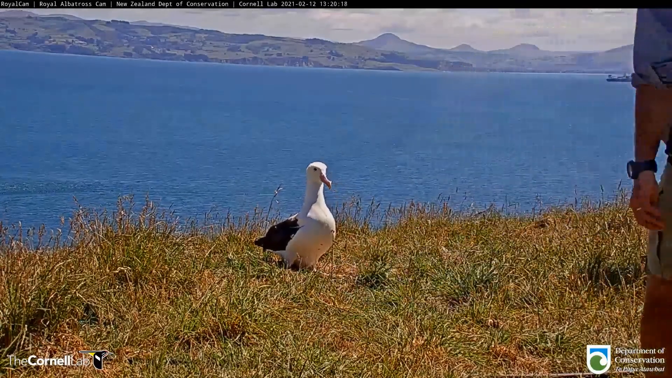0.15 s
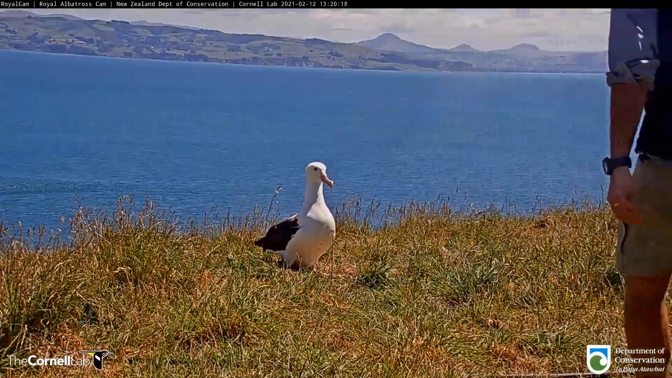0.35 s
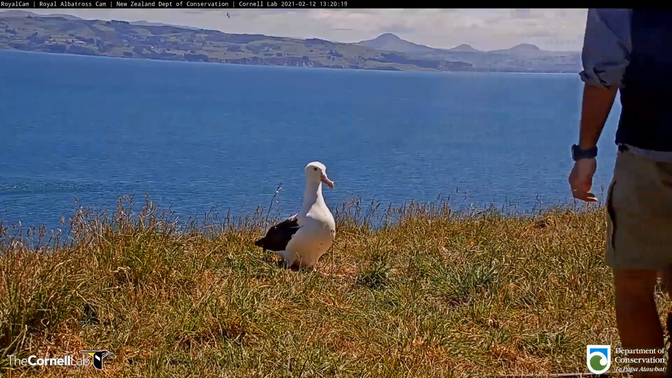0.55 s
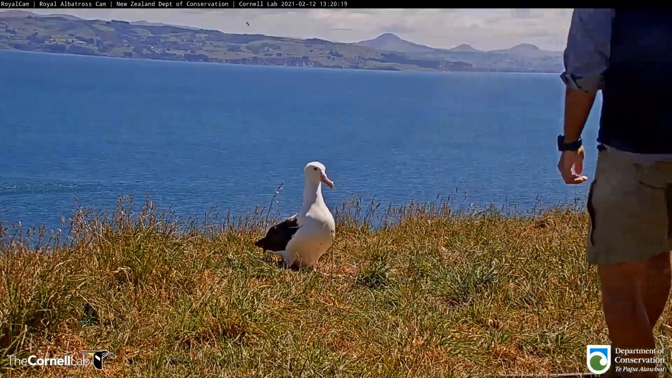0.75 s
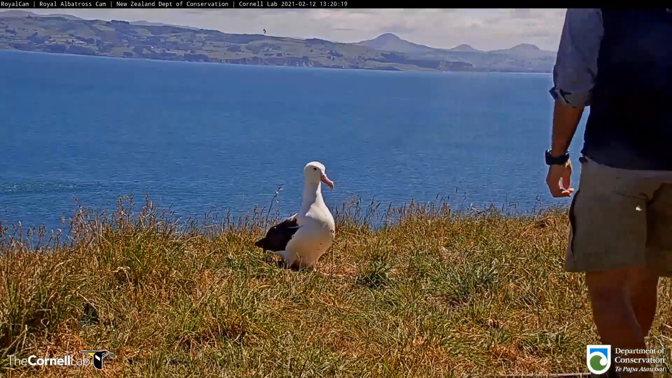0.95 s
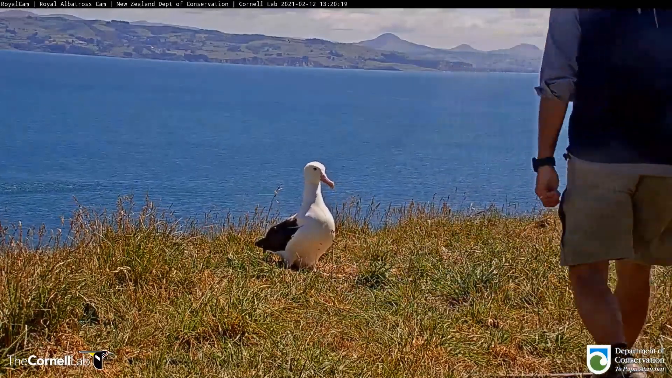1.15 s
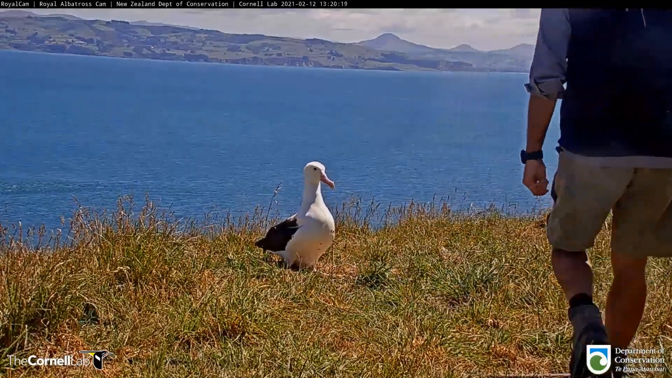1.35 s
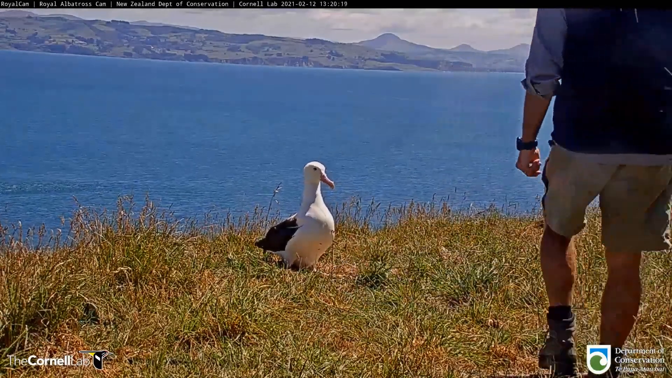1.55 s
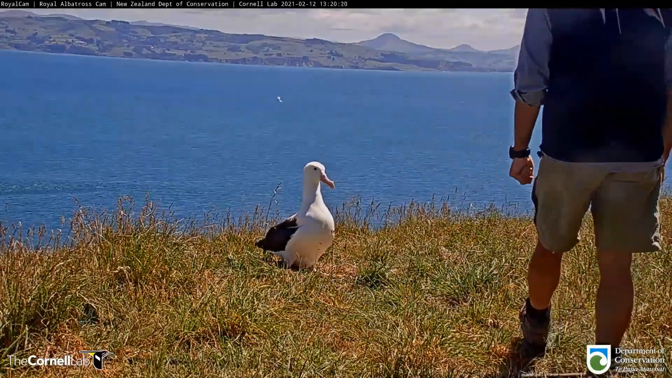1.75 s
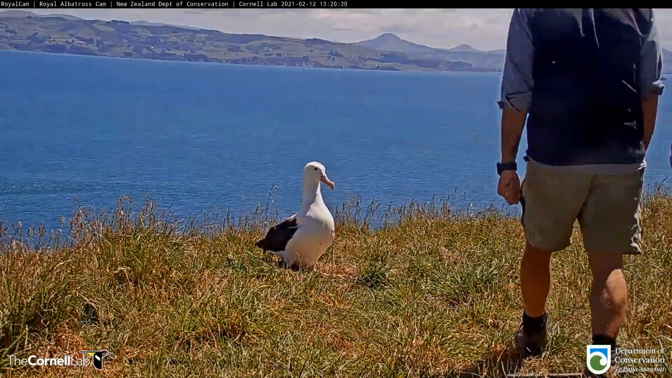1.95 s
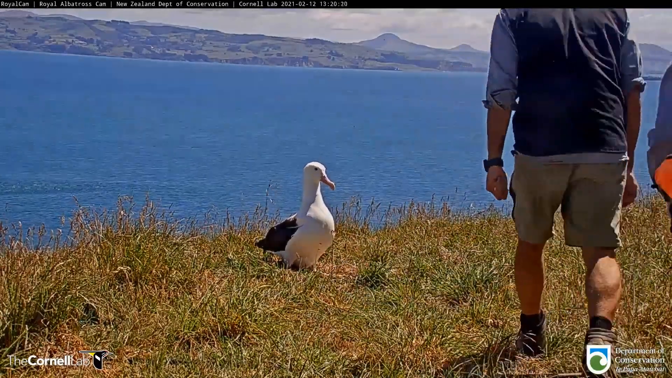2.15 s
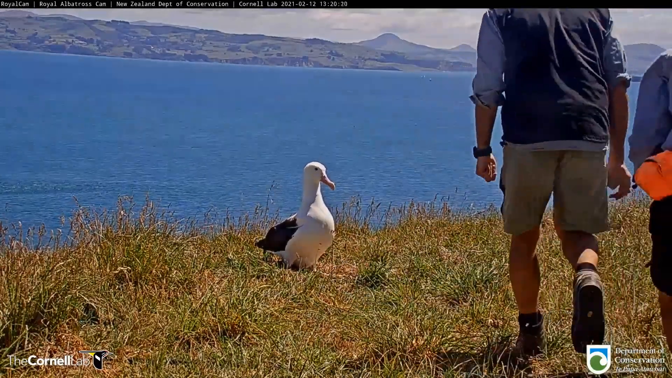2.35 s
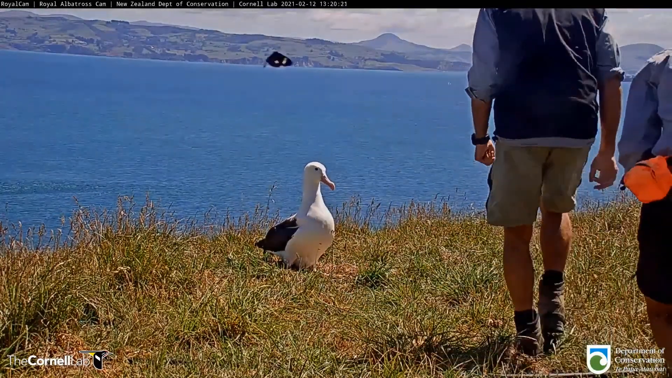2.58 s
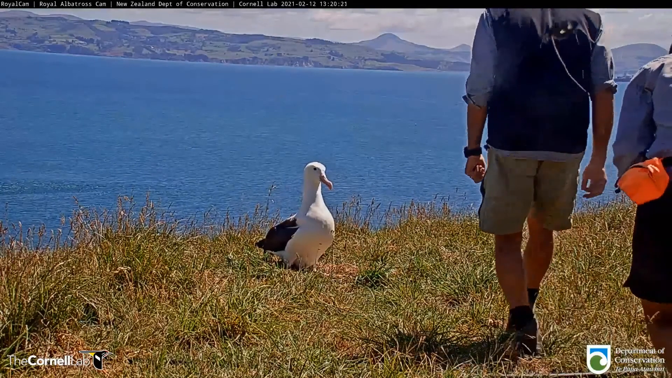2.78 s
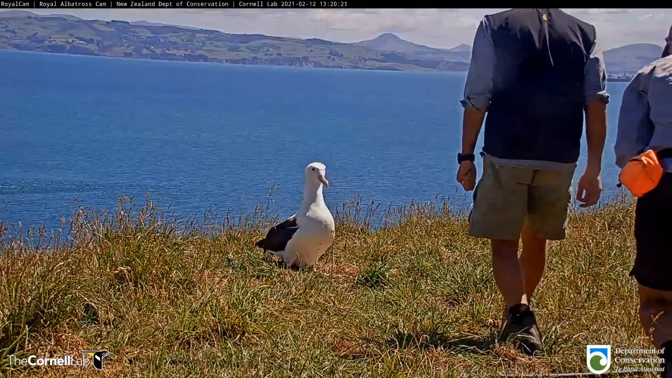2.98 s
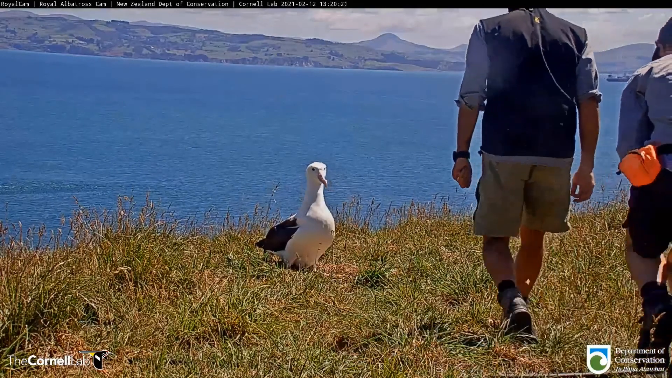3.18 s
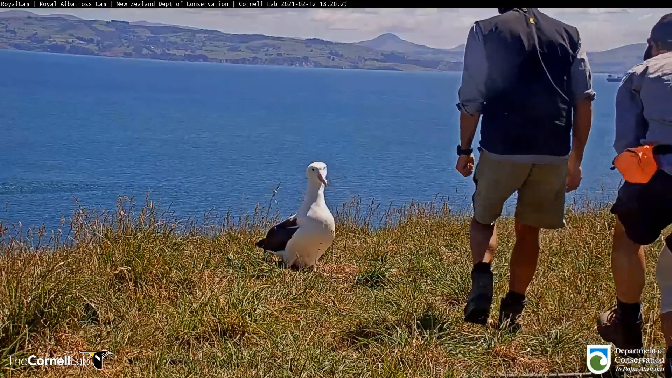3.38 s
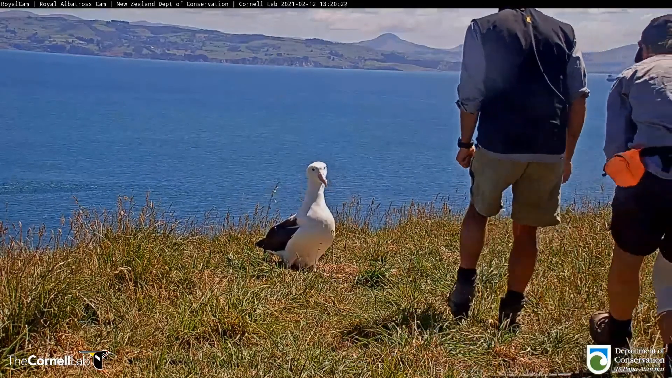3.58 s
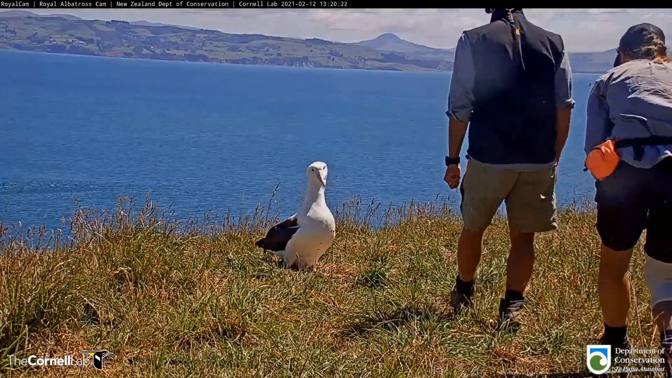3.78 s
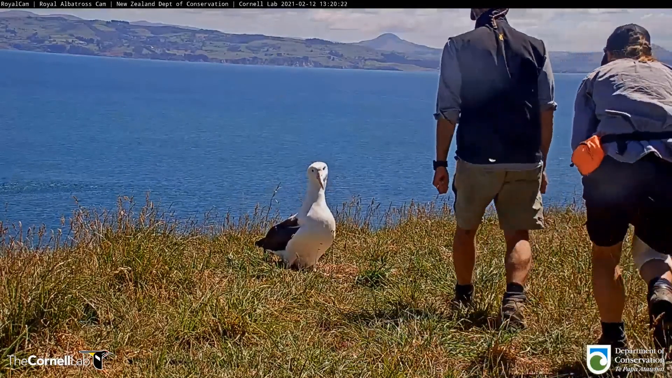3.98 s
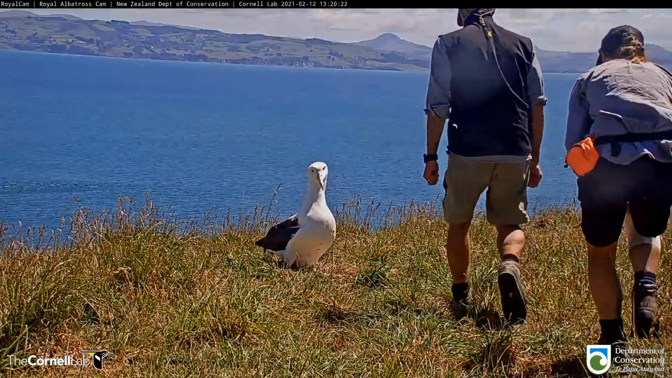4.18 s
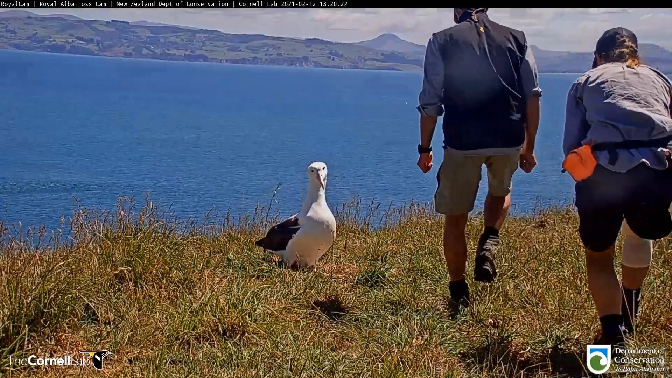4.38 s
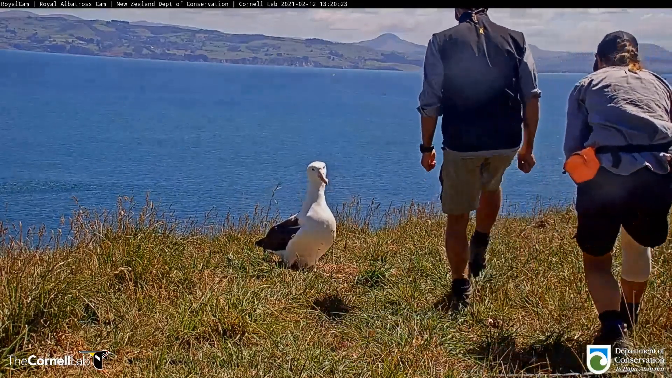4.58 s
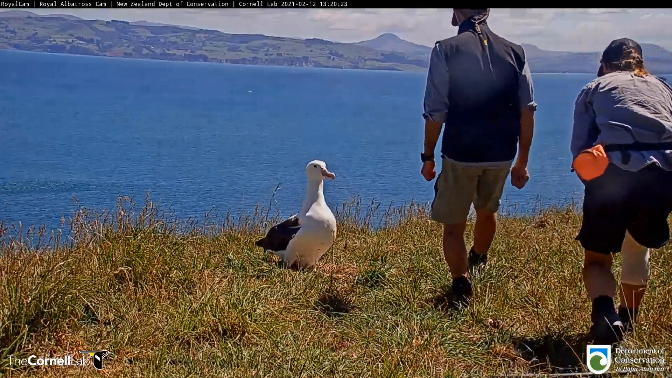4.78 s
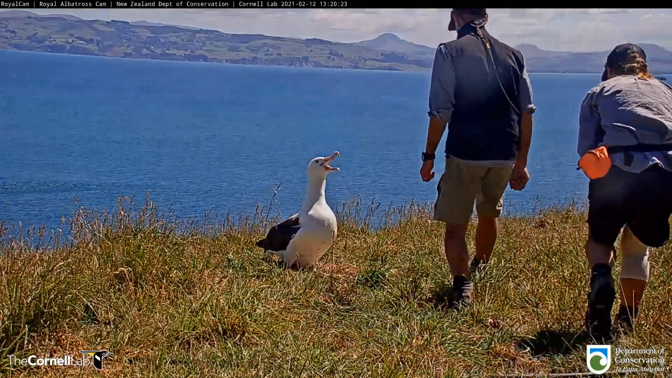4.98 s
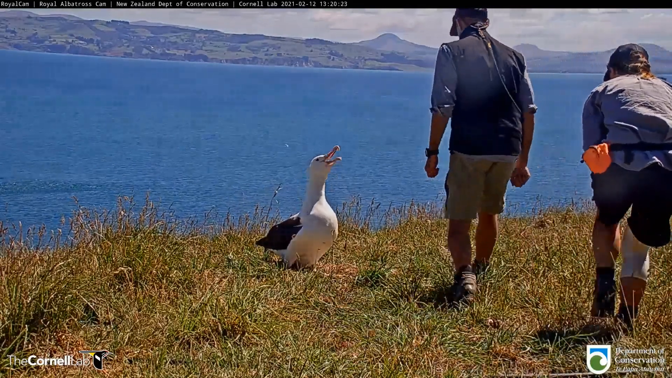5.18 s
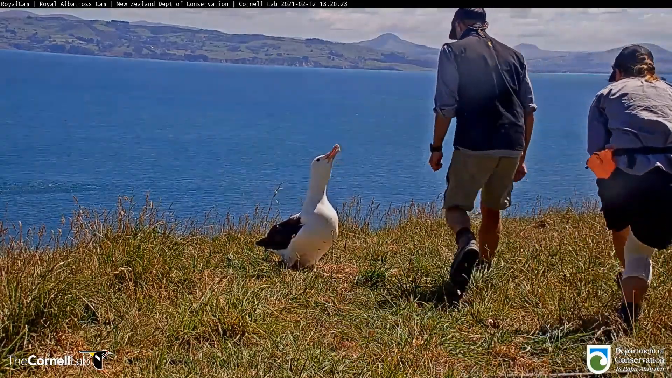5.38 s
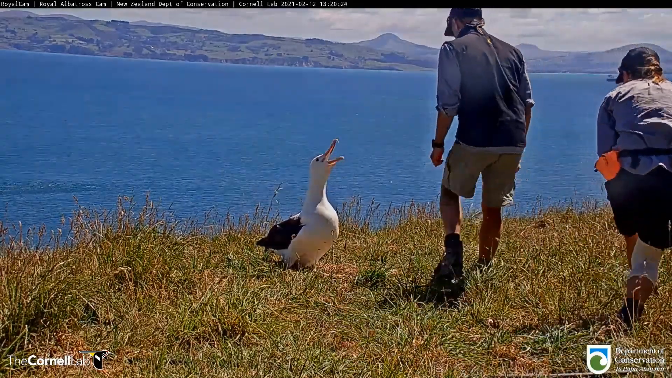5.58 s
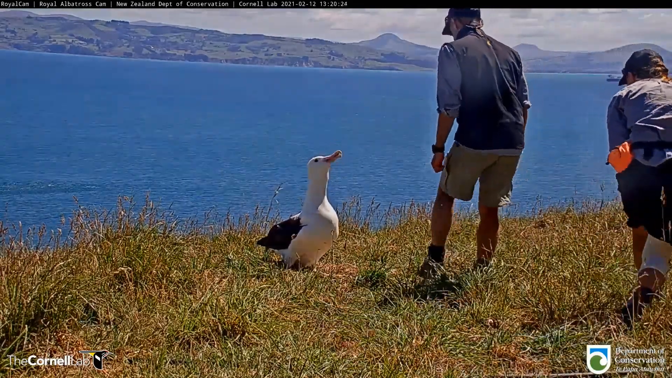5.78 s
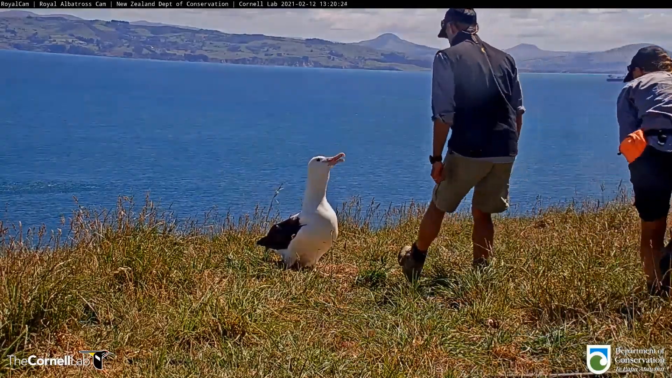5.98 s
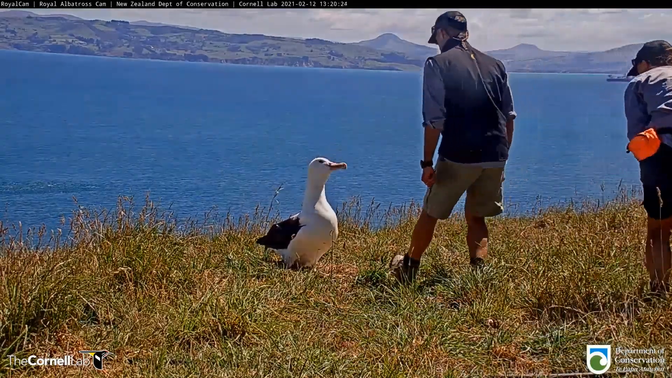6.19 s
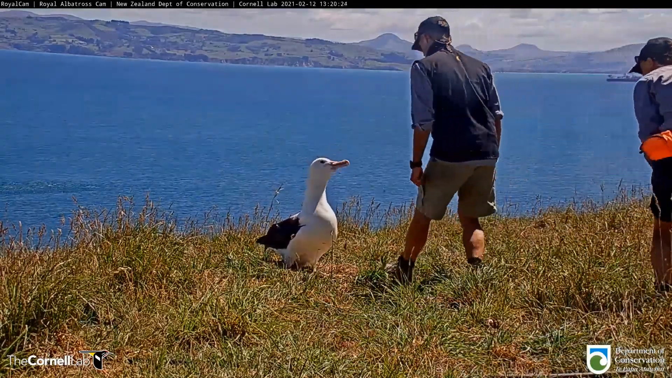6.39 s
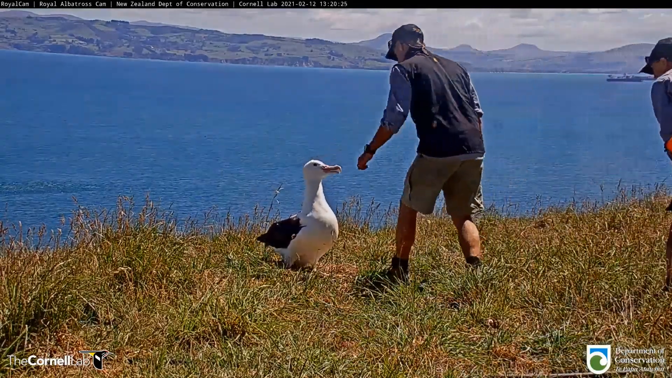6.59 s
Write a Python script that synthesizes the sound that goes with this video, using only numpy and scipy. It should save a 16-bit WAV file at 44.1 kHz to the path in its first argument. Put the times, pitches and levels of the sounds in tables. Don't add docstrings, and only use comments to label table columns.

```python
import sys
import numpy as np
from scipy import signal
from scipy.fft import rfft, irfft
from scipy.io import wavfile
from scipy.ndimage import uniform_filter1d

SR = 44100
rng = np.random.default_rng(int(sys.argv[2]) if len(sys.argv) > 2 else 0)


def amplitude_ratio(level_db):
    exponent = np.asarray(level_db, float) / 20
    return 10 ** exponent


def wav_out(sig):
    wavfile.write(sys.argv[1], SR, np.round(np.clip(np.atleast_2d(sig).T, -1, 1) * 32767).astype(np.int16))


N = 292779

# f/Hz, density/(dB per Hz)
RUMBLE_SPECTRUM = [(8.8, -30), (15, -10.5), (25, 3), (32, -5.5), (40, -0.5), (52, 2.5), (58, -3.5),
                   (66, -18), (95, -31), (130, -57.5), (170, -67), (290, -120)]
# t/s, peak level/dB
WIND_BUFFETS = [(.18, -44.5), (.33, -37.5), (.49, -33), (.68, -36.5), (.83, -34.5), (.99, -44.5),
                (1.679, -36), (1.83, -39), (2.15, -34), (2.41, -41.5), (3.0, -31.5), (3.171, -37),
                (3.33, -37.5), (3.66, -30), (3.86, -33.5), (3.999, -33), (4.18, -33), (4.649, -29.5),
                (4.838, -37.5), (4.99, -36.5), (5.17, -31.5), (5.31, -41), (5.669, -35.5), (5.86, -31.5),
                (6.01, -37.5), (6.16, -31.5)]
# t/s, level/dB
BREEZE_CURVE = [(0, -5), (.12, -2), (.3, -2.5), (1.3, 0), (1.7, -0.5), (2.4, 1), (3.1, -2), (3.8, 0),
                (4.4, 0), (4.8, -4), (5.4, -2), (6.2, 1.3), (6.64, -4.5)]
BUFFET_S, BREEZE_DB, AIR_DB = 0.021, -38.5, -52
# f/Hz, density/(dB per Hz)
SURF_SPECTRUM = [(50, -30.5), (62, -0.5), (72, 3), (82, -1.5), (93, -6), (106, -15.5), (125, -30.5),
                 (165, -42.5)]
SURF_DB = -54.5
# f/Hz, density/(dB per Hz)
HISS_SPECTRUM = [(100, -14), (130, -18), (200, -22), (255, -32.5), (380, -13.5), (520, -19.5), (1100, -14),
                 (2400, -13.5), (5000, -27.5), (6300, -32.5), (7000, -28), (7600, -32)]
# f/Hz, width/Hz, level over the rest/dB
HOUSING_MODES = [(720, 370, 13), (1750, 250, 7.5), (2964, 150, 10), (3324, 230, 7.5), (4376, 1130, 13.5),
                 (6150, 310, 5.5)]
# f/Hz, rms level/dB
ELECTRONIC_TONES = [(468.3, -60.5), (586.8, -71), (1825, -68), (2810, -66), (2929, -68), (3278, -76)]
# f/Hz, rms level/dB
MACHINE_TONES = [(53, -51.5), (71, -67), (91, -62.5), (103, -74), (120, -90.5)]
# t/s, peak level/dB, low edge f/Hz, high edge f/Hz, length/ms
STALK_CRACKS = [(.07, -56, 1000, 5000, 2.7), (0.219, -55, 1000, 5000, 3), (0.361, -37.5, 1500, 2370, 6.7),
                (0.363, -39, 2400, 4900, 4.0), (1.546, -37.5, 2920, 4630, 6.2),
                (1.547, -43, 1300, 2200, 3.7), (1.59, -46, 1400, 2200, 3.5), (1.607, -43, 700, 2000, 4.5),
                (1.562, -38, 1500, 4000, 3.3), (1.66, -39, 500, 1400, 5.0), (1.726, -34.5, 900, 3500, 5.3),
                (1.776, -39, 1400, 2200, 5.0), (1.776, -49, 120, 700, 4.6), (1.778, -39.5, 3000, 4700, 5.9),
                (1.982, -43, 1400, 2090, 13), (2.018, -37, 3600, 5440, 4.0), (2.018, -40, 900, 1800, 2.1),
                (2.157, -39, 1400, 2400, 4.0), (2.431, -41.5, 500, 1480, 14), (2.981, -39, 600, 4550, 7.1),
                (3.101, -54, 2000, 5000, 3)]
# t/s, half length/s, level/dB
LEG_SWISHES = [
    (0.102, .08, -62),
    (1.7, .06, -61),
    (2.096, 0.13, -55.5),
    (2.93, 0.19, -58),
    (3.45, 0.23, -58),
]

# t/s, level/dB, whistle f/Hz, rasp share/1
EFFORT_1 = [
    (1.135, -25.5, 2220, 0.3),
    (1.1455, -20.5, 1920, 0.36),
    (1.1525, -18.5, 2190, 0),
    (1.1632, -16.5, 2220, 0.05),
    (1.1735, -19, 2380, 0.3),
    (1.2749, -25, 2274, 0.87),
    (1.2882, -20, 1864, 0.1),
    (1.3029, -21.5, 1790, 0.05),
    (1.317, -32, 1600, 0.25),
    (1.335, -36.5, 1655, 0.25),
]
EFFORT_2 = [
    (3.8406, -26.5, 2215, 0.87),
    (3.8551, -20.5, 2290, 0.08),
    (3.8676, -18, 2316, 0.04),
    (3.9298, -21, 2307, 0.12),
    (3.9816, -18.5, 2194, 0.093),
    (3.9961, -21.5, 2220, 0.075),
    (4.0205, -24.5, 2030, .08),
    (4.0370, -24.5, 1975, .08),
    (4.0530, -33, 2090, 0.8),
    (4.0730, -36.5, 1737, 0.36),
]
EFFORT_3 = [
    (5.341, -25, 2287, 0.4),
    (5.3553, -22.5, 2263, 0.22),
    (5.38, -18.5, 2326, 0.13),
    (5.4034, -22.5, 2306, 0.32),
    (5.4625, -25.5, 2280, 0.7),
    (5.486, -23, 2320, 0.88),
    (5.5124, -24, 2225, .2),
    (5.5534, -27, 2018, 0.068),
    (5.5844, -33, 2050, 0.25),
]
THROB_COUNTS = [
    (1, 1, 1, 1, 8, 1, 1, 1, 1),
    (1, 1, 5, 4, 1, 2, 1, 1, 1),
    (1, 2, 2, 5, 2, 2, 3, 2),
]
SQUEAL_LEVELS = [
    (-31, -30, -25, -30, -4, -8, -16, -30, -30, -30),
    (-30, -27.5, -26.5, -5.5, -22, -24, -25, -23, -25, -25),
    (-30, -22, -17, -7, -6.5, -6, -20, -26, -26),
]
# f/Hz, gain/dB
THROAT_COLOUR_1 = [(530, -54), (850, -34), (1150, 1), (1450, -1.5), (1750, 3), (2000, 7), (2300, -2),
                   (2600, -2.5), (2940, -0.5), (3460, -12.5), (3970, 2), (4400, -11.5), (4800, -18),
                   (5500, -17.5), (6000, -36), (6500, -28), (7000, -38), (9100, -76), (15400, -120)]
THROAT_COLOUR_2 = [(800, -60), (1350, 0), (1600, -4.5), (1900, 0.5), (2300, 8), (2750, -7), (3050, 2),
                   (3500, -10.5), (3850, -1.5), (4250, -15), (4650, -8.5), (5200, -17), (5700, -24),
                   (7000, -37)]
THROAT_COLOUR_3 = [(900, -27), (1480, -3), (1870, -4.5), (2310, 6), (2550, -2.5), (2850, -1.5), (3250, -5),
                   (3650, -21.5), (4250, -0.5), (4600, -7), (5100, -33), (5800, -22.5), (7000, -43)]
# f/Hz, gain/dB
OPENING_COLOUR = [(2400, 3.5), (2900, 7), (3300, 7), (5500, 4.5)]
# multiple of the voice pitch/1, level in cry 1, 2 and 3/dB
VOICE_PARTIALS = [(1, -26, -26, -26), (2, 0, 0, 0), (3, -14, -8, -14), (4, -18, -18, -16),
                  (5, -30, -29, -30)]
# f/Hz, gain/dB
BEAK_GAIN = [(2700, 1), (3120, 3), (3360, -7), (3500, 2), (3850, 0), (4200, 3), (4480, -8), (4680, 2),
             (5200, 7), (5600, -12)]

# t/s, peak level/dB, mouth f/Hz, throat f/Hz, throat level/dB
WIDE_CLACK = [
    (5.2102, -2.5, 1842, 1510, -24),
]
# t/s, peak level/dB, mouth f/Hz, throat f/Hz, throat level/dB
CLACK_TRAIN = [
    (5.3665, -2.5, 1524, 1910, -15),
    (5.4846, -2, 1445, 1840, -9.5),
    (5.5904, -0.5, 1472, 1808, -11.5),
    (5.7044, -3.5, 1461, 1770, -12),
    (5.8138, -4.5, 1455, 1750, -14.5),
    (5.9172, -2, 1500, 1840, -18),
    (6.0362, -3.5, 1498, 1840, -17),
    (6.1441, -6.5, 1535, 1810, -16.5),
    (6.26, -7, 1594, 1830, -15),
]
# skull level/dB, jaw level/dB, horn level/dB, tip level/dB
CLACK_COLOURS = [(-1.5, 1, -1, -0.5), (-0.5, 1, 3, -0.5), (0.5, 4, -3.5, 6.5), (-0.5, -2, 0.5, 4),
                 (2.5, 1.5, 1.5, 3.5), (1, 4.5, 1, -2), (-1.5, 2, -1, 1), (0.5, 2.5, -1.5, 2),
                 (-1.5, 4, -1.5, -6), (-1.5, 5, -1, -14)]
# mouth t60/s, throat t60/s
CLACK_DECAYS = [(0.029, 0.031), (0.027, .035), (0.032, 0.037), (0.023, 0.034), (0.03, 0.032), (0.034, .042),
                (0.026, 0.042), (.027, 0.04), (0.029, 0.036), (0.025, .025)]
# f/Hz, level/dB, t60/s
WIDE_BILL_MODES = [(514, -14.5, 0.03), (700, -12.5, 0.019), (1920, -17.5, 0.025), (2580, -11, 0.054),
                   (3000, -8.5, 0.035), (3620, -11, 0.034), (4000, -22, 0.017), (4380, -8.5, 0.022),
                   (5200, -23, .02), (5640, -26, 0.028), (6740, -44, .012)]
TRAIN_BILL_MODES = [(414, -21, 0.035), (700, -7.5, 0.012), (774, -8, 0.0079), (2050, -9, 0.037),
                    (2380, -28.5, 0.084), (2773, -4, 0.031), (2650, -9, 0.0089), (2920, -15.5, 0.033),
                    (3360, -21.5, 0.016), (3574, -13.5, 0.037), (3860, -14, 0.025), (4460, -14.5, 0.019),
                    (4550, -17, 0.026), (5046, -19.5, 0.022), (6000, -36.5, 0.015), (6300, -39.5, 0.015)]
HORN_PEAK_DB = -19
# t/s, level/dB
GROWL_CURVE = [
    (5.45, -63),
    (5.6, -49),
    (5.8, -48),
    (6., -44.5),
    (6.2, -44),
    (6.35, -48),
    (6.42, -85),
]
# t/s, peak level/dB, mouth f/Hz, horn level/dB
BILL_TOUCHES = [(5.651, -36, 1520, -34), (5.668, -46, 1640, -13), (5.517, -31, 1400, -20),
                (6.017, -40.5, 2500, -1), (5.885, -36.5, 1393, 1), (5.9683, -35, 2080, 12),
                (5.984, -34, 1500, 12), (6.001, -35, 2030, -2), (6.098, -35, 1530, 0),
                (6.111, -38, 1435, 21), (6.226, -38, 1500, -6), (6.311, -34, 1540, -5),
                (6.4614, -25, 1590, -3), (6.471, -25.5, 1566, -10)]
# t/s, peak level/dB, f/Hz, length/ms
LONE_GULPS = [
    (5.518, -32.5, 514, 12),
    (5.562, -28.5, 700, 6.9),
    (5.577, -31, 670, 12),
    (5.749, -38, 487, 11),
    (6.099, -42, 762, 8.3),
    (6.2, -37, 920, 34),
    (6.47, -21, 800, 6.1),
    (6.477, -24.5, 742, 14),
    (6.504, -35, 734, 5.4),
    (6.472, -32, 501, 13.4),
]
# t of the last/s, its peak level/dB, its f/Hz,
# spacing/ms, growth a gulp/dB
SWELLING_GULPS = [
    (5.688, -29, 720, 20.4, 4),
    (5.794, -26.5, 700, 20, 14.5),
    (5.899, -29.5, 756, 14, 8),
    (6.016, -25, 700, 16, 5),
    (6.133, -29.5, 758, 11, 2),
    (6.247, -29.5, 742, 11.3, 0.5),
    (6.362, -34, 720, 21, 13),
]
GULP_RISE, GULP_MS = 0.065, 10.6
TOP_HZ = 6840


def on_log_axis(table, hz):
    f, db = np.transpose(table)
    return np.interp(np.log(np.maximum(hz, 1)), np.log(f), db)


def coloured(x, table):
    hz = np.arange(len(x) // 2 + 1) * SR / len(x)
    y = irfft(rfft(x) * amplitude_ratio(on_log_axis(table, hz)), len(x))
    return y / np.sqrt(np.mean(y ** 2))


def curve(table):
    return amplitude_ratio(np.interp(np.arange(N) / SR, *np.transpose(table)))


def walk(rate, size=N):
    k = max(int(SR / rate), 1)
    held = np.repeat(rng.standard_normal(size // k + 1), k)
    return 1.357 * uniform_filter1d(uniform_filter1d(held, k), k)[:size]


def add(out, s, sound):
    i = int(round(s * SR))
    out[i:i + len(sound)] += sound[:N - i]


def buffeting():
    t = np.arange(N) / SR
    swells = sum(amplitude_ratio(2 * db) * np.exp(-((t - s) / BUFFET_S) ** 2) for s, db in WIND_BUFFETS)
    breeze = curve(BREEZE_CURVE) * amplitude_ratio(BREEZE_DB + 2.3 * walk(7.9))
    return np.sqrt(swells + breeze ** 2)


def housed_hiss():
    hz = np.arange(N // 2 + 1) * SR / N
    resonance = sum(d / (1 + (2 * (hz - f) / w) ** 2) for f, w, d in HOUSING_MODES)
    spectrum = rfft(rng.standard_normal(N)) * amplitude_ratio(on_log_axis(HISS_SPECTRUM, hz) + resonance)
    puffs = walk(25)
    hiss = 0
    for centre in np.arange(6, 14):
        share = np.clip(1 - np.abs(np.log2(np.maximum(hz, 64)) - centre), 0, 1)
        hiss = hiss + irfft(spectrum * share, N) * amplitude_ratio(puffs + walk(9.9))
    band = (hz > 600) & (hz < 5000)
    return hiss * N / np.sqrt(2 * np.sum(np.abs(spectrum[band]) ** 2))


def wind():
    rumble = coloured(rng.standard_normal(N), RUMBLE_SPECTRUM)
    rumble = rumble / np.sqrt(uniform_filter1d(rumble ** 2, 3500) + 0.15)
    gusts = buffeting() * rumble
    bass = [(56, -7.5), (64, -2.5), (90, -4.5), (115, -11), (160, -30.0)]
    gusts = coloured(gusts, bass) * np.std(gusts) * amplitude_ratio(-1.5)
    surf = amplitude_ratio(SURF_DB + 0.42 * walk(1.5)) * coloured(rng.standard_normal(N), SURF_SPECTRUM)
    return gusts + surf + amplitude_ratio(AIR_DB + 0.069 * walk(8.0)) * housed_hiss()


def hum():
    t = np.arange(N) / SR
    high = sum(amplitude_ratio(db + walk(5.2)) * np.sin(2 * np.pi * hz * t + 1.2 * walk(7.8))
               for hz, db in ELECTRONIC_TONES)
    low = sum(amplitude_ratio(db + 2.0 * walk(0.64)) * np.sin(2 * np.pi * hz * t + 1.47 * walk(2.875))
              for hz, db in MACHINE_TONES)
    return np.sqrt(2) * (high + low)


def stalks():
    out = np.zeros(N)
    n = np.arange(600)
    for s, db, low_hz, high_hz, ms in STALK_CRACKS:
        snap = rng.standard_normal(600) * np.exp(-n / (ms * SR / 2000)) * np.minimum(n / 15., 1)
        snap = signal.lfilter(*signal.butter(3, [low_hz, high_hz], "band", fs=SR), snap)
        add(out, s, amplitude_ratio(db) * snap / np.abs(snap).max())
    return out


def swishes():
    t = np.arange(N) / SR
    swell = sum(amplitude_ratio(db) * np.exp(-((t - s) / half_s) ** 2) for s, half_s, db in LEG_SWISHES)
    colour = [(900, -18), (1800, -0.5), (3500, 1), (5000, -4), (6800, -11.5)]
    grass = coloured(rng.standard_normal(N), colour)
    return swell * amplitude_ratio(2.3 * walk(60)) * grass


def throbs_of(effort, squeal, steps, share, count=1, order=0):
    at = np.cumsum([0, *steps])
    n = np.arange(at[-1] + 1)
    columns = [*np.transpose(effort), squeal]
    s, db, hz, rasp, squeal_db = (np.interp(n, at, column) for column in columns)
    outer = (n < count) | (n > n[-1] - order)
    return np.transpose([s, db, hz, rasp, hz * np.where(outer, 1 / 3, share), squeal_db])


def cry(throbs, throat, partial_db, flat, skew, duty, scoop, sweep, point, cede, breath, spread,
        rasp_rise, rise=0.076, tail=0.18, dull_db_s=28.0, held=1.0, late=1.4):
    out = np.zeros(N)
    u = np.arange(-1024, 1024) / SR
    orders = np.arange(1, 23)[:, None]
    starts = spread * orders ** 2
    onset = throbs[0][0]
    times, levels, *_ = np.transpose(throbs)
    gaps = np.minimum(np.gradient(times), .015)
    gaps[np.argmax(levels)] *= held
    gaps[0] = 0.018
    high_pass = signal.butter(2, 2700, "high", fs=SR, output="sos")
    for (s, db, hz, rasp, rasp_hz, squeal_db), gap in zip(throbs, gaps):
        broken = 0.33 if rasp_hz > .3 * hz else 1
        place = u / (duty * gap) + .12 * skew
        lean = np.clip(place * (1 + skew * (place < 0)), -.5, .5)
        swell = np.abs(np.cos(np.pi * lean)) ** (flat + point * (1 - min(rasp, 1)))
        swell = swell + tail * np.exp(-(place / 1.33) ** 2) * (s + u > onset - gaps[0] / 2)

        slide = rise * np.clip(place, -.6, .2) - scoop * np.exp(-np.clip(place + 0.449, 0, 1) / 0.07)
        phase = np.pi * hz * np.cumsum(1 + slide + 0.011 * walk(290, size=len(u))) / SR
        whistle = 0
        for (k, *_), d in zip(VOICE_PARTIALS, partial_db):
            dulling = (2 < k < 5) * dull_db_s * (s - onset)
            gain = amplitude_ratio(d + on_log_axis(BEAK_GAIN, k * hz / 2) - dulling)
            whistle = whistle + gain * np.sin(k * phase + k * k)

        waver = broken ** 2 * rasp_rise * np.clip(place, -.6, .6) + broken * 0.06 * walk(400, size=len(u))
        turns = rasp_hz * np.cumsum(1 + waver) / SR
        stack = np.cos(2 * np.pi * orders * (turns - turns[1024] + 0.15) + starts).sum(axis=0)
        harsh = coloured(stack + broken * breath * rng.standard_normal(len(u)), throat)
        if s == onset:
            harsh = coloured(harsh, OPENING_COLOUR)
        treble = signal.sosfiltfilt(high_pass, harsh)
        harsh = harsh + treble * np.clip(late * (place + 0.05), -0.75, 0.5)

        climb = 1 + sweep * np.clip(place + 0.3, 0, 0.33) + 0.08 * place + 0.017 * walk(400, size=len(u))
        squeal = amplitude_ratio(squeal_db) * np.sin(2 * np.pi * hz * np.cumsum(climb) / SR)
        squeal = squeal * np.exp(-((place - 0.1) / 0.24) ** 2)
        yielding = cede * amplitude_ratio(squeal_db) * np.clip((place + 0.17) / 0.2, 0, 1)
        whistle = whistle * np.clip(1 - yielding, 0, 1)

        rasp = np.clip(rasp * ((place + 0.78) / 0.13).clip(.08, 1), 0, 1)
        voice = np.sqrt(1 - rasp) * whistle + np.sqrt(rasp / 2) * harsh + squeal
        add(out, s + u[0], amplitude_ratio(db) * swell * voice)
    return out


def cries():
    _, db_1, db_2, db_3 = np.transpose(VOICE_PARTIALS)
    throbs_1 = throbs_of(EFFORT_1, SQUEAL_LEVELS[0], THROB_COUNTS[0], 0.22, count=2)
    throbs_2 = throbs_of(EFFORT_2, SQUEAL_LEVELS[1], THROB_COUNTS[1], 0.25, order=2)
    throbs_3 = throbs_of(EFFORT_3, SQUEAL_LEVELS[2], THROB_COUNTS[2], 0.21)
    first = cry(throbs_1, THROAT_COLOUR_1, db_1, flat=0.26, skew=0.47, duty=0.98, rise=0.034, tail=0.12,
                scoop=0.12, sweep=0.7, point=0.58, held=1.34, cede=0.92, breath=0.77, spread=0.43,
                rasp_rise=0.52, late=1.2)
    second = cry(throbs_2, THROAT_COLOUR_2, db_2, flat=0.73, skew=0.34, duty=0.9, dull_db_s=50.5,
                 scoop=0.14, sweep=0.63, point=0.1, rise=0.03, cede=0.4, breath=0.6, spread=0.4,
                 rasp_rise=0.4)
    third = cry(throbs_3, THROAT_COLOUR_3, db_3, flat=0.24, skew=0.89, duty=0.91, dull_db_s=20.5,
                scoop=0.15, sweep=0.78, point=0.22, held=1.2, cede=0.52, breath=0.6, spread=0.17,
                rasp_rise=0.39, late=3.3)
    return first + amplitude_ratio(-0.5) * second + third


def ring(hz, t60, glide=0., glide_s=0.0036, bloom=0., bloom_s=0.0012):
    t = np.arange(2600) / SR
    swing = np.sin(2 * np.pi * hz * (t - glide * glide_s * (1 - np.exp(-t / glide_s))))
    return swing * (1 - bloom * np.exp(-t / bloom_s)) * 1000. ** (-t / t60)


def clacks(rows, colours, decays, bill, glide, glide_s):
    out = np.zeros(N)
    for row, colour, (mouth_s, throat_s) in zip(rows, colours, decays):
        s, db, mouth_hz, throat_hz, throat_db = row
        skull_db, jaw_db, extra_db, tip_db = colour
        horn_db = HORN_PEAK_DB - db + extra_db
        chance = rng.standard_normal((len(bill), 2))
        blow = ring(1.0205 * mouth_hz, mouth_s, glide, glide_s, 1.0, 0.0012)
        blow = blow + amplitude_ratio(throat_db + 5.0) * ring(1.06 * throat_hz, throat_s, 0.23, 0.0036, 1.0)
        for k, ((hz, d, t60), (a, b)) in enumerate(zip(bill, chance)):
            part_db = skull_db if hz < 600 else jaw_db if hz < 1000 else tip_db if hz > 4700 else 0
            gain = (-1) ** k * amplitude_ratio(d + a + (horn_db + 5.5) * (hz > 2000) + part_db)
            blow = blow + gain * ring(hz * (1 + 0.012 * b), t60, 0.084, 0.00068, 0.44, 0.00087)
        crack_colour = [(1500, -5.0), (2200, 4.0), (4800, -11.5), (5600, -23.5 + tip_db), (7000, -35 + tip_db)]
        crack = coloured(rng.standard_normal(len(blow)), crack_colour)
        t = np.arange(len(blow)) / SR
        blow = blow + amplitude_ratio(horn_db - 5.0) * crack * t / 0.0033 * np.exp(1 - t / 0.0028)
        blow = blow + amplitude_ratio(-12.5) * ring(1900, 0.0024)
        add(out, s - 0.0005, 1.1 * amplitude_ratio(db) * blow)
    return out


def growl():
    gate = 0.066 + np.maximum(np.sin(2 * np.pi * 75 * np.cumsum(1 + 0.22 * walk(30)) / SR), 0) ** 2
    throat = [(130, -40.0), (200, -9.0), (330, -17.5), (450, -2.0), (800, -2.5), (1050, -4.5),
              (1500, -9.5), (2700, -11.0), (3500, -34.0)]
    return curve(GROWL_CURVE) * 1.13 * gate * coloured(rng.standard_normal(N), throat)


def touches():
    out = np.zeros(N)
    n = np.arange(300)
    for s, db, mouth_hz, horn_db in BILL_TOUCHES:
        body = ring(mouth_hz, 0.052) + 1.2 * amplitude_ratio(horn_db) * ring(2720, 0.024) + .3 * ring(2100, .025)
        scrape = rng.standard_normal(300) * np.exp(-n / 70) * (rng.random(300) < .1)
        scrape[0] = 1.2
        sound = np.convolve(body, uniform_filter1d(scrape, size=7))
        add(out, s, amplitude_ratio(db) * sound / np.abs(sound).max())
    return out


def gulp_rows():
    runs = [(s - k * gap_ms / 1000, db - k * grow_db, hz * (1 - k * GULP_RISE), GULP_MS)
            for s, db, hz, gap_ms, grow_db in SWELLING_GULPS for k in range(3)]
    return runs + LONE_GULPS


def gulps():
    out = np.zeros(N)
    for s, db, hz, ms in gulp_rows():
        t = np.arange(int(1.31 * ms * SR / 1000)) / SR
        tone = np.sin(2 * np.pi * hz * t)
        tone = tone + 0.17 * np.sin(2 * np.pi * 440 * t + 8.9 * rng.random())
        tone = tone + 0.15 * np.sin(2 * np.pi * 0.93 * hz * t) * np.exp(-t / 0.004)
        swell = np.sin(np.pi * (t / t[-1]) ** 0.68) ** 2
        add(out, s - .0025, 0.58 * amplitude_ratio(db) * swell * tone)
    return out


def bill_contacts():
    wide = clacks(WIDE_CLACK, CLACK_COLOURS[:1], CLACK_DECAYS[:1], WIDE_BILL_MODES, glide=0.27, glide_s=0.0046)
    train = clacks(CLACK_TRAIN, CLACK_COLOURS[1:], CLACK_DECAYS[1:], TRAIN_BILL_MODES, glide=0.16, glide_s=0.01)
    bill = wide + train + touches()
    n = np.arange(3000)
    scatter = rng.standard_normal(3000) * 1000. ** (-n / (0.07 * SR)) * (n > 0.006 * SR)
    return bill + amplitude_ratio(-47.5) * signal.fftconvolve(bill, scatter)[:N]


def scene():
    ground = wind() + hum() + stalks() + swishes()
    bird = 0.63 * cries() + bill_contacts() + gulps()
    bird = 0.16 * bird + 0.83 * signal.lfilter(*signal.iirnotch(1020, 6., SR), bird)
    radiated = signal.sosfilt(signal.butter(8, 370, "high", fs=SR, output="sos"), bird)
    return (ground + radiated + amplitude_ratio(-22.5) * bird + growl())[None]


def roll_off(x):
    return signal.sosfilt(signal.butter(12, 7740, fs=SR, output="sos"), x)


def record(dry):
    rounded = 0.94 * np.tanh(dry / 0.92)
    narrow = signal.sosfilt(signal.butter(26, TOP_HZ, fs=SR, output="sos"), rounded)
    narrow = narrow * np.clip((N - np.arange(N)) / 300, 0, 1)
    return roll_off(narrow)


dry = scene()
out = record(dry)
wav_out(out)
```